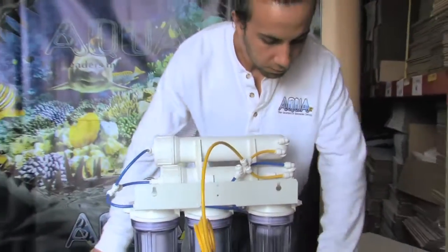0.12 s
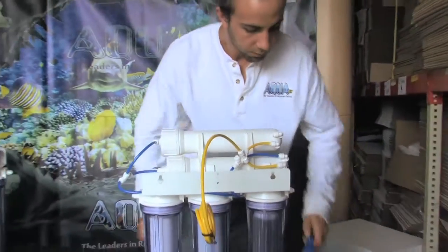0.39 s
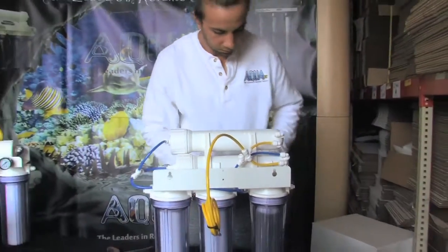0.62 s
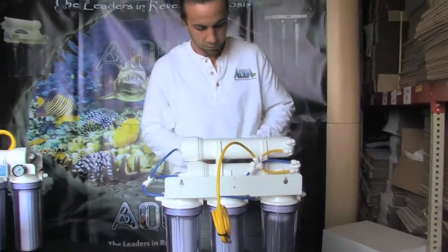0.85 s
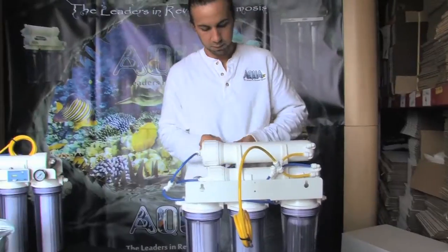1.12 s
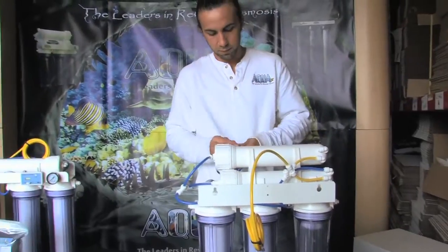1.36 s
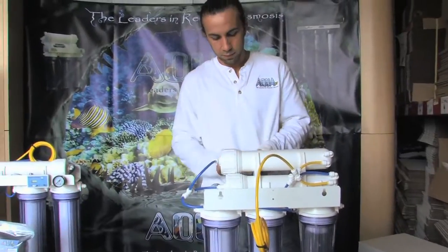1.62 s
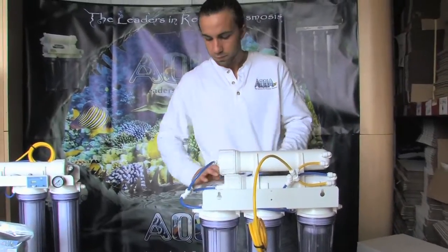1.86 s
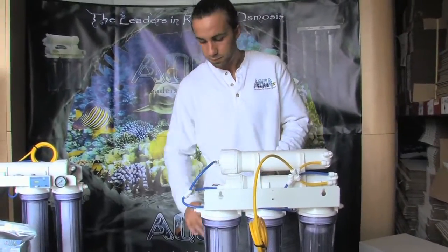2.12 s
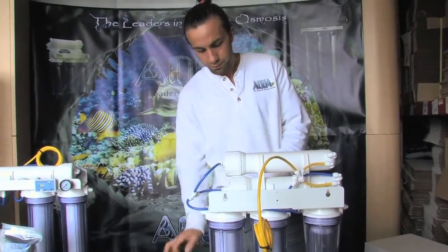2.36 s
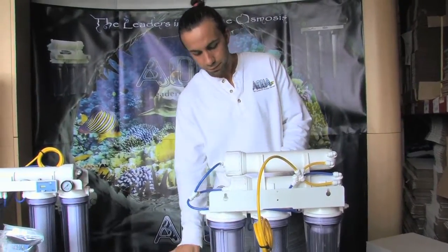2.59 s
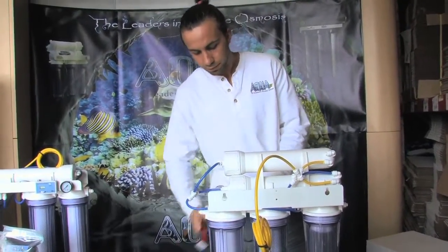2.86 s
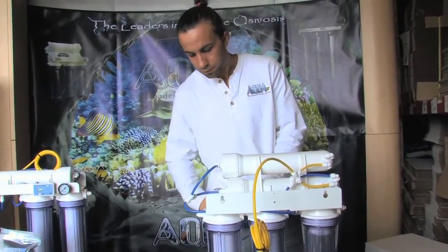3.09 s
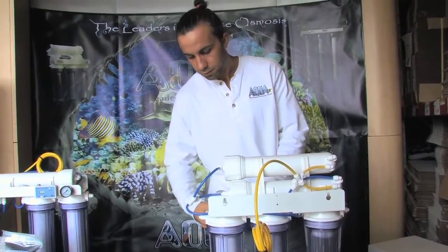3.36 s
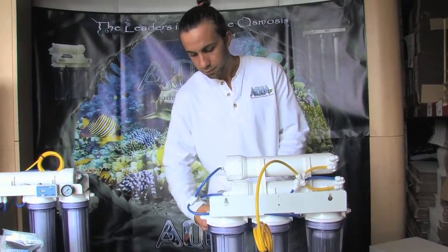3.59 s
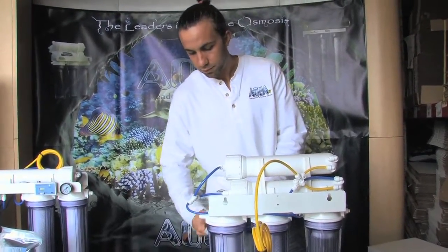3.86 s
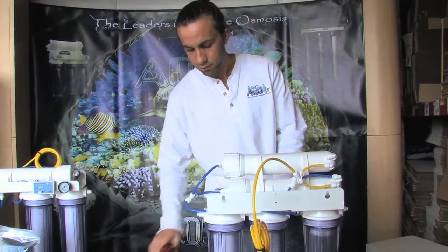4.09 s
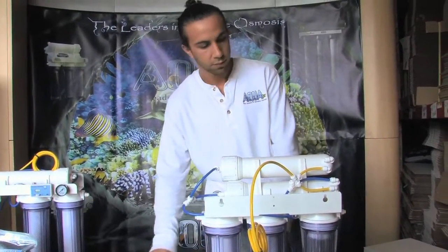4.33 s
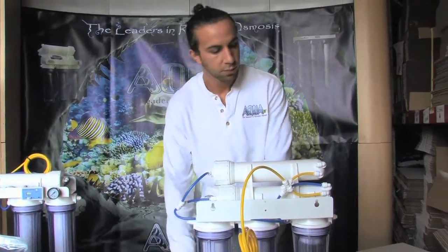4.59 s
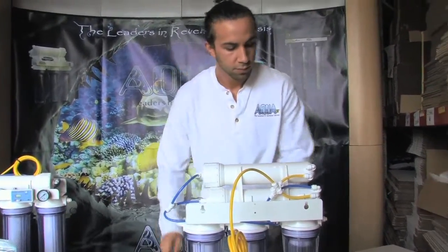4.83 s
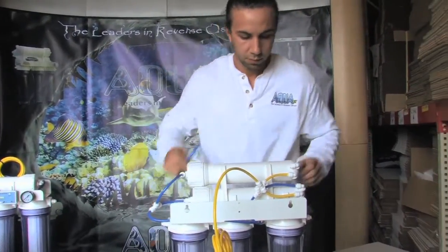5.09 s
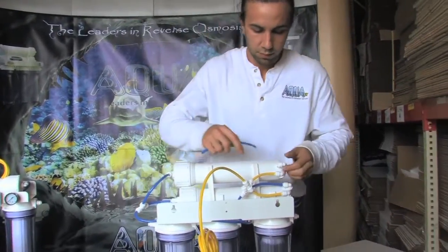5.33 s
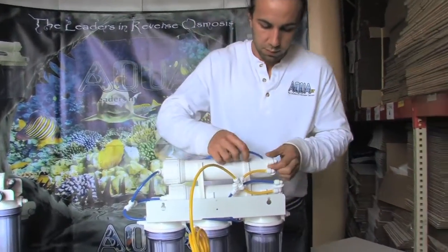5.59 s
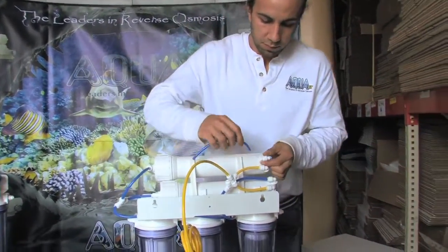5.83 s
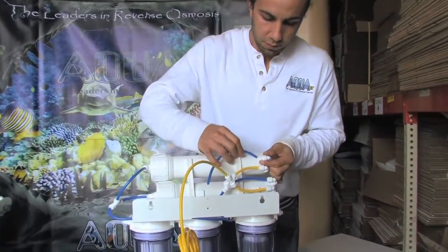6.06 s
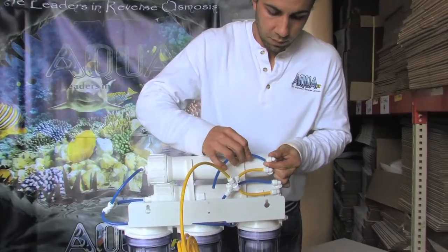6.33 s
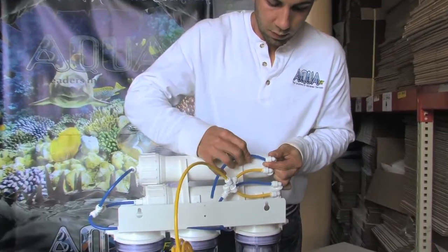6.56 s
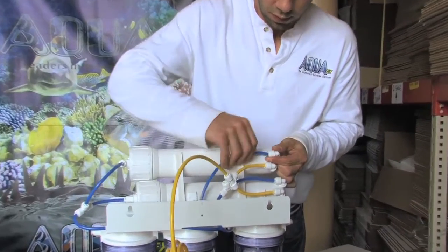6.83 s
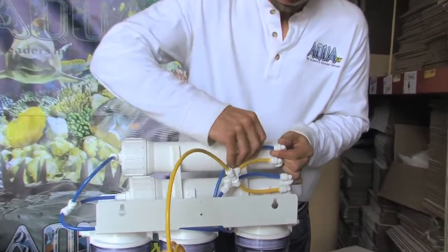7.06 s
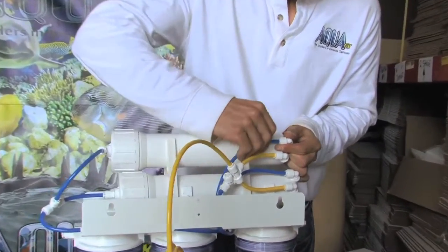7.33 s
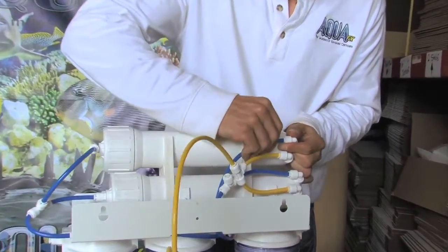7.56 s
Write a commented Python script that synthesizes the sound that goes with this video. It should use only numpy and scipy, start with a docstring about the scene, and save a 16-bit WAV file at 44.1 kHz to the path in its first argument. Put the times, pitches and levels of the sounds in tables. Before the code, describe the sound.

In a quiet storeroom, hands fumble plastic fittings: soft knocks, faint ticks and sleeve rustle, a crisp snap, a loud hollow clatter, then near silence.

```python
"""Plastic push-in fittings and tubing handled on a hollow table top in a quiet storeroom: modal impacts.
Fittings tick and one snaps loudly (damped modes); parts knock and bounce on the top (modes and a dry crack).
Squeaks are gliding tones; sleeves rustle and a finger rubs a tube as swells of shaped noise.
Air noise that slowly swells and sinks, and steady faint microphone hiss, are shaped noise too;
a low sine hum comes and goes, soft thuds are bursts of low noise, and a diffuse room tail follows the hits."""
import sys
import numpy as np
from scipy import signal
from scipy.io import wavfile
from scipy.ndimage import uniform_filter1d, minimum_filter1d

SR = 44100
rng = np.random.default_rng(int(sys.argv[2]) if len(sys.argv) > 2 else 0)


def log_audio(samples):
    """Write samples as a 16-bit WAV file to the path given in sys.argv[1]."""
    # one column per channel
    frames = np.atleast_2d(samples).T
    # limit to full scale, then quantise
    limited = np.clip(frames, -1, 1)
    pcm = np.round(limited * 32767).astype(np.int16)
    wavfile.write(sys.argv[1], SR, pcm)


def attenuation_scalar(level_db):
    """Turn a level in dB into a linear amplitude multiplier (20 dB per decade)."""
    decades = np.asarray(level_db, float) / 20
    return 10 ** decades


N = 338959  # length in samples


def read(points, hz):
    """Spectral interpolation: value of a table on a log-frequency axis."""
    f, value = np.transpose(points)
    return np.interp(np.log(hz + 1), np.log(f + 1), value)


def curve(points):
    """Amplitude envelope: gain of a (t/s, level/dB) curve at every sample."""
    s, db = np.transpose(points)
    return attenuation_scalar(np.interp(np.arange(N) / SR, s, db))


def swells(rows):
    """Addition of incoherent powers: each rises and falls smoothly around its row's middle."""
    t = np.arange(N) / SR
    power = np.zeros(N)
    for middle, length, db in rows:
        phase = np.pi * np.clip((t - middle) / length, -.5, .5)
        power += attenuation_scalar(2 * db) * np.cos(phase) ** 4
    return power


def add(mix, s, sound):
    """Linear superposition: mixes a sound in at time s."""
    part = mix[round(s * SR):][:len(sound)]
    part += sound[:len(part)]


def noise(shape, patchy_db):
    """Gaussian noise by spectral shaping: random short-time spectra with drifting patches, rms 1."""
    a, b, patches = rng.standard_normal((N // 256 + 5, 513, 3)).T
    patches = uniform_filter1d(patches, size=12, axis=0)
    patches = uniform_filter1d(patches, size=12, axis=1)
    shape_db = read(shape, np.fft.rfftfreq(1024, 1 / SR))[:, None]
    spectra = (a + 1j * b) * attenuation_scalar(shape_db + patchy_db * patches / patches.std())
    x = signal.istft(spectra, nperseg=1024, noverlap=768)[1][:N]
    return x / x.std()


def ring(modes, peak_hz, below_db, above_db, damping, minor_db, rise, detune, count):
    """Modal superposition: detuned main modes in a crowd of weaker ones, at chance phases; peak near 1."""
    hz, db, t60 = np.transpose(modes)
    place, phase = rng.random((2, count + len(hz)))
    crowd_place = (np.arange(count) + place[:count]) / count
    crowd = hz[0] * (hz[-1] / hz[0]) ** crowd_place ** .8
    db = np.r_[read(np.c_[hz, db], crowd) + minor_db, db]
    t60 = np.r_[read(np.c_[hz, t60], crowd), t60] / np.clip(damping, .2, 5)
    hz = hz * (1 + detune * (place[count:] - .5))
    # grip and contact pull the nearest mode to the brightest pitch
    hz[abs(np.log(hz / peak_hz)).argmin()] = peak_hz
    hz = np.r_[crowd, hz]
    # levels fall away from the brightest pitch, in dB per octave
    octaves = np.log2(hz / peak_hz)
    db -= np.maximum(-max(below_db, 0) * octaves, max(above_db, 0) * octaves)
    # each mode is a rotating, decaying phasor, computed in blocks of 128 samples
    pole = (2j * np.pi * hz - np.log(1000) / t60) / SR
    blocks, within = np.arange(0, t60.max() * SR, 128), np.arange(128)
    starts = attenuation_scalar(db) * np.exp(2j * np.pi * phase + blocks[:, None] * pole)  # state at each block start
    sound = (starts @ np.exp(pole[:, None] * within)).imag.ravel()
    t = np.arange(len(sound)) / SR
    sound *= (1 - np.exp(-t / rise)) ** 2
    return sound / np.sqrt(4 * uniform_filter1d(sound ** 2, size=220).max())


def hiss():
    """Electronic noise: the microphone's stationary random signal lies mostly in the treble."""
    # hiss spectrum: f/Hz, relative level/dB per Hz
    hiss_shape = [(1000, -20), (3000, -1), (9200, -1), (9900, 2), (10600, -2), (13000, -1), (16000, -2)]
    return attenuation_scalar(-77.5) * noise(hiss_shape, patchy_db=0.1)


def air():
    """Broadband random noise: the room's air noise, mostly low, slowly swells and sinks."""
    # air spectrum: f/Hz, relative level/dB per Hz
    air_shape = [(20, -53.5), (45, -15), (75, -1), (124, 3), (180, -4), (300, -4), (420, -6), (950, -4.5),
                 (1500, -9.5), (2000, -13.5), (2550, -17.5), (3100, -25), (4200, -31), (9000, -34.5),
                 (16000, -45)]
    # air noise, swelling in the middle: t/s, level/dB
    air_level = [(0, -51.5), (.5, -59), (1.45, -57), (2, -59.5), (2.6, -57.5), (3.2, -60), (3.6, -57.5),
                 (3.75, -54), (4, -57.5), (4.3, -49.5), (5.1, -48.5), (5.6, -53.5), (5.75, -58.5),
                 (7.1, -58), (7.4, -55.5), (7.69, -61)]
    return curve(air_level) * noise(air_shape, patchy_db=.6)


def hum():
    """Amplitude modulation: a low sine of fixed frequency fades in and out."""
    # hum swells: middle t/s, length t/s, level/dB
    hum_rows = [(4.95, 0.84, -51), (5.45, .2, -61), (6.75, 0.45, -57.5), (7.05, 0.3, -62),
                (7.26, 0.42, -52), (7.55, .5, -56), (7.7, 0.083, -48)]
    hum_hz = 127
    return np.sqrt(2 * swells(hum_rows)) * np.sin(2 * np.pi * hum_hz * np.arange(N) / SR)


def thuds():
    """Low-frequency transients: soft pushes through floor and table swell quickly and die as rumble."""
    # soft pushes: t/s, level/dB, length t/s (the swell peaks after a third of it)
    pushes = [(0.134, -46, 0.21), (.3, -49.5, 0.033), (1.814, -57.5, 0.048), (2.685, -49.5, 0.085),
              (3.771, -49, 0.037), (4.328, -46.5, 0.23), (4.46, -36, 0.13), (4.685, -59, 0.11),
              (5.497, -59.5, 0.17), (6.22, -57, 0.12), (6.629, -59, 0.059)]
    # rumble spectrum: f/Hz, relative level/dB per Hz
    rumble_shape = [(25, -30.5), (50, -6), (75, -1), (110, -2.5), (160, -12), (300, -51), (16000, -120)]
    swell, t = np.zeros(N), np.arange(SR // 2) / SR
    for s, db, length in pushes:
        u = 3 * t / length
        add(swell, s, attenuation_scalar(db) * u * np.exp(1 - u))
    return swell * noise(rumble_shape, patchy_db=-0.5)


def rustle():
    """Friction noise: strokes of the sleeves swell as broadband noise over a faint rest level."""
    # sleeve strokes: middle t/s, length t/s, level/dB
    strokes = [(.05, .5, -76), (.35, .26, -60), (1.07, .12, -67), (1.5, .8, -72), (2.68, .25, -66),
               (2.885, .05, -62), (3.68, .45, -69), (4.5, .9, -63.5), (5, .5, -64), (5.25, .9, -66),
               (5.61, .08, -79)]
    # cloth spectrum: f/Hz, relative level/dB per Hz
    cloth_shape = [(1000, -38), (2000, -5), (3500, -7.5), (6000, -11.5), (9000, -14), (12000, -15),
                   (16000, -21)]
    rest_db = -76.5
    power = attenuation_scalar(2 * rest_db) + swells(strokes)
    return np.sqrt(power) * noise(cloth_shape, patchy_db=2)


def tube_rubs():
    """Narrow-band friction noise: a finger rubs a tube."""
    # rubs: middle t/s, length t/s, level/dB
    rubs = [(1.15, 0.37, -72), (1.42, .35, -66.5)]
    # rubbed tube spectrum: f/Hz, relative level/dB per Hz
    rub_shape = [(1500, -42), (2200, 1), (2400, 2), (2650, -10), (3600, -40)]
    return np.sqrt(swells(rubs)) * noise(rub_shape, patchy_db=2)


def squeaks():
    """Stick-slip oscillation: fast slips of plastic on plastic give a short, wavering, gliding tone."""
    # squeaks: t/s, level/dB, starting f/Hz before waver, glide as a frequency factor, length t/s
    slides = [(0.135, -57, 3050, .99, 0.055), (1.274, -58, 5200, 0.82, 0.017),
              (1.303, -61, 5100, .96, .014), (1.318, -68, 6800, 0.81, .014),
              (1.446, -55, 3330, 1.03, 0.011), (1.69, -70, 12200, .94, .02),
              (7.332, -48.5, 2500, 1.43, 0.013), (7.642, -57, 1700, 1.01, 0.011),
              (7.654, -49.5, 1590, 1.02, 0.0087)]
    out = np.zeros(N)
    for s, db, hz, glide, length in slides:
        u = np.linspace(0, 1, round(length * SR))
        waver = 1 + .15 * uniform_filter1d(rng.standard_normal(4000), size=60)[:len(u)]
        cycles = np.cumsum(hz * glide ** u * waver) / SR
        add(out, s, attenuation_scalar(db) * np.sin(np.pi * u) * np.sin(2 * np.pi * cycles))
    return out


def knocks():
    """Impact excitation: blows ring the top where the contact favours it, with a dry crack at the start."""
    # blows: t/s, level/dB, crack level/dB relative to the blow, brightest f/Hz, fall away from it/dB per octave
    blows = [(0.107, -35, -31.5, 900, 2), (0.144, -20, -28, 655, 6), (0.158, -25.5, -25, 604, 2),
             (0.187, -25.5, -34, 1265, 22), (0.193, -28, -34, 1150, 6), (0.205, -28, -33, 400, 4),
             (.220, -27.5, -36, 830, 11), (0.239, -26.5, -25, 790, 6), (0.28, -42, -23, 164.4, 15),
             (2.567, -33.5, -29, 510, 12), (2.589, -41, -18, 200.6, 11), (2.683, -42, -36, 1020, 8),
             (2.689, -39, -37, 1100, 11), (2.696, -28.5, -34, 666, 9), (2.714, -36, -29, 304, 10),
             (3.876, -19.5, -1, 900, 7), (3.894, -16.5, -7, 900, 7), (3.907, -19.5, -37, 840, 26),
             (3.924, -23, -34, 1000, 6), (4.049, -34, -15, 886, 2), (4.077, -27, -13, 1076, 5),
             (4.3292, -27, -31.5, 1200, 7), (4.331, -0.5, -27, 750, 3.5), (4.341, -14, -6.5, 290, 3.5),
             (4.370, -5, -9, 1500, 6.5), (4.373, -0.5, -17, 566, 6), (4.379, -4, -13.5, 720, 8.5),
             (4.384, -24, -16, 747, 14.5), (4.397, -18, -28, 500, 1.5), (4.459, -12, -40, 670, 6),
             (4.467, -16, -40, 720, 8), (4.481, -17.5, -33, 1080, 7), (4.485, -9.5, -35, 555, 6),
             (4.504, -17, -32, 282, 11), (4.542, -17.5, -14.5, 839, 2), (4.56, -18.5, -19, 627, 6),
             (4.576, -16.5, -33, 400, 16), (4.605, -19.5, -16, 344.7, 5), (4.626, -32, -10, 334, 4.5),
             (4.707, -6.5, -15, 616, 3), (4.718, -9.5, -29.5, 670, 4), (4.726, -10.5, -16, 592, 3.5),
             (4.79, -24, -15.5, 670, 4), (4.802, -24, -30, 790, 1), (5.6, -40.5, -16, 1386, 18),
             (7.292, -45.5, -19.5, 900, -1), (7.609, -44.5, -23, 735, 8)]
    # table top modes: f/Hz, relative level/dB, t60/s before damping
    top_modes = [(150.8, -5.5, 0.18), (168, -7, 0.36), (239, -23, 0.085), (290, -5.5, 0.11),
                 (402, -18.5, 0.23), (424, -8.5, 0.078), (496, 0.5, 0.023), (582, -3, 0.084),
                 (690, -14, 0.053), (735, -2.5, 0.07), (790, -5.5, 0.12), (900, 0, 0.04), (1000, -5, 0.073),
                 (1220, -9.5, .08), (1396, -7.5, 0.078), (1500, -11.5, 0.092), (1806, 1.5, 0.017),
                 (1960, -12.5, 0.039), (2097, -12, 0.057), (2180, -7.5, 0.04), (2488, -5, 0.048),
                 (2730, -10.5, 0.054), (3004, -17, 0.14), (3450, -33, 0.059), (3800, -13, 0.043),
                 (4325, -31.5, .04), (5100, -41, .04)]
    full_damping, damping_db_per_db = 1.59, 0.1053  # full_damping holds for a 0 dB blow
    soft_fall_db_per_db = 0.07  # dB per octave for each dB of crack level

    t = np.arange(900) / SR
    band = signal.butter(1, [2300, 4210], "band", fs=SR, output="sos")
    treble_cut = signal.butter(2, 6000, fs=SR, output="sos")
    cracks = signal.sosfilt(np.r_[band, treble_cut], rng.standard_normal((len(blows), len(t))))
    cracks *= attenuation_scalar(-60 * t / 0.024) * (1 - np.exp(-t / 0.00034))

    out = np.zeros(N)
    for (s, db, crack_db, hz, fall_db), crack in zip(blows, cracks):
        # harder blows leave the part pressed on the top and die sooner
        damping = full_damping * attenuation_scalar(damping_db_per_db * db)
        # the weaker the crack, the softer the contact and the duller the blow
        above_db = fall_db - soft_fall_db_per_db * crack_db
        blow = ring(top_modes, hz, fall_db, above_db, damping,
                    minor_db=-4.0, rise=0.00042, detune=0.03, count=60)
        add(out, s, attenuation_scalar(db) * blow)
        crack_peak = np.sqrt(4 * uniform_filter1d(crack ** 2, size=100).max())
        add(out, s, attenuation_scalar(db + crack_db) * crack / crack_peak)
    return out


def ticks():
    """Modal response to impact: small hard contacts ring the fitting near the brightest pitch."""
    # contacts: t/s, level/dB, brightest f/Hz, fall above it/dB per octave
    contacts = [(0.143, -42, 2900, 4), (0.1606, -42, 2300, 1), (0.1687, -44, 2300, 3),
                (0.1774, -48, 2300, 4), (0.2203, -43, 2300, 4), (0.2486, -46, 7200, 5),
                (0.256, -38.5, 4200, 1), (0.9948, -43, 3900, 6), (1.0014, -37.5, 4300, 9),
                (1.075, -50, 3800, 14), (1.4506, -49.5, 3430, 3), (1.5704, -60, 2920, 6),
                (1.5803, -38.5, 4320, 8), (1.5893, -42, 3590, 3), (1.754, -56, 4550, 3.5),
                (1.7793, -42.5, 3320, 0), (1.7928, -33, 3410, 20), (1.8113, -44, 3170, 5),
                (1.8372, -50, 2860, 15), (1.8956, -52, 3140, 8.9), (2.6364, -51, 3230, 10),
                (2.711, -49.5, 2700, 12), (2.8936, -48.5, 3820, 9), (2.984, -56, 2740, 7),
                (3.035, -52.5, 6440, 2), (3.1524, -46, 4150, 15), (3.2174, -44, 4750, 14),
                (3.3144, -62, 4200, 14), (3.466, -51.5, 2680, 9.9), (3.5402, -47, 3300, 10),
                (4.167, -53, 7450, -1), (4.3321, -20.5, 7650, 3.5), (4.339, -25, 6850, 4),
                (4.356, -33, 7200, 3), (4.3705, -23, 5200, 1.5), (4.3765, -24, 8000, 1.5),
                (4.3824, -19, 7370, 8), (4.3905, -30, 9000, 3), (4.4, -33, 7500, 4),
                (4.5456, -22.5, 2830, -0.3), (4.5525, -27.5, 2860, 4.5), (4.584, -31.5, 2750, 5),
                (4.6076, -42, 2580, 0), (4.7078, -22, 9900, 7.5), (4.714, -25.5, 8800, -1),
                (4.7324, -33, 7200, 11), (4.7257, -20.5, 2860, 16), (4.7415, -29, 9600, 9),
                (5.5739, -30, 7020, 1.5), (6.4368, -50, 7340, 6), (6.4606, -45.5, 6960, 4),
                (7.156, -49, 2580, 4), (7.1893, -32, 4250, 2), (7.1888, -32.5, 11850, 3),
                (7.3115, -56, 3070, -5), (7.3337, -44, 2860, 5)]
    # fitting modes: f/Hz, relative level/dB, t60/s before damping
    fitting_modes = [(1000, 2.5, 0.017), (1800, 5, 0.011), (2320, -0.5, 0.015), (3170, 6.5, 0.0076),
                     (4216, 3, 0.0084), (5400, -3, 0.0056), (6510, 9, 0.0047), (8290, 9.5, 0.0031),
                     (10020, -0.5, 0.0082), (11310, 0, 0.0079), (14000, -8, .007), (15680, -9, 0.0064)]
    out = np.zeros(N)
    for s, db, hz, above_db in contacts:
        below_db = 1 + 1.4 * above_db  # a tick that is narrow above its pitch is narrow below it too
        tick = ring(fitting_modes, hz, below_db, above_db, damping=0.72,
                    minor_db=-3.5, rise=0.00054, detune=0.068, count=60)
        add(out, s, attenuation_scalar(db) * tick)
    return out


def snap():
    """Repeated impulsive excitation: a few slips within milliseconds each ring the collar anew."""
    # slips: t/s, level/dB
    slips = [(3.781, -31), (3.7834, -14.5), (3.7842, -3.5), (3.7858, -12.5)]
    # snapping collar modes: f/Hz, relative level/dB, t60/s before damping
    collar_modes = [(178.4, -13.5, 0.0098), (500, -8, 0.0059), (950, -22, 0.0088), (1290, -8.5, 0.034),
                    (1740, -3, 0.034), (2250, -5.5, 0.029), (2700, -6, 0.017), (3140, -3.5, 0.028),
                    (3537, -7.5, .02), (4350, -2, .017), (5175, -5, 0.03), (5960, -2, 0.013),
                    (6650, -3, .015), (8100, -6, .013), (9650, -6, .015), (10940, -12, 0.015),
                    (12800, -15, .012), (15170, -29.5, .011)]
    out = np.zeros(N)
    for s, db in slips:
        slip = ring(collar_modes, 1712, 0, 0, damping=0.96,
                    minor_db=-11, rise=0.00034, detune=0.0067, count=200)
        add(out, s, attenuation_scalar(db) * slip)
    return out


def room(x):
    """Diffuse field: each band's energy arrives a little late, dies at its own speed, has chance phases."""
    # reverberation time: f/Hz, t60/s
    room_t60 = [(150, .25), (400, 0.14), (1000, .18), (2800, 0.19), (7000, 0.25), (14000, 0.3)]
    hz, t, z = signal.stft(x, SR, nperseg=256, noverlap=192)
    power = uniform_filter1d(abs(z) ** 2, size=3, axis=0)
    keep = attenuation_scalar(-120 * t[1] / read(room_t60, hz))  # share of the energy left after one frame
    power = np.array([signal.lfilter([1 - k], [1, -k], p) for k, p in zip(keep, power)])
    a, b = rng.standard_normal((len(t), len(hz), 2)).T
    tail_spectra = np.sqrt(abs(power)) * (a + 1j * b)
    tail = signal.istft(tail_spectra, SR, nperseg=256, noverlap=192)[1]
    return np.r_[np.zeros(300), tail][:N]  # delay in samples


def scene():
    """Superposition of direct and diffuse fields: hits with their room sound over the other layers."""
    low, high, loud = knocks(), ticks() + squeaks(), snap()
    wet = room(attenuation_scalar(-5.5) * low + attenuation_scalar(-12.5) * high + attenuation_scalar(-11.5) * loud)
    friction = rustle() + tube_rubs()
    background = air() + hiss() + hum() + thuds()
    return (low + high + loud + wet + friction + background)[None]


def low_pass(x):
    """Removes everything above the highest recorded frequency."""
    return signal.sosfilt(signal.butter(12, 16460, fs=SR, output="sos"), x)


def record(dry):
    """Band limiting and gain control: deep bass and top edge are lost, a fast limiter holds the peaks."""
    bass_cut = signal.sosfilt(signal.butter(3, 42, "high", fs=SR, output="sos"), dry)
    headroom = np.minimum(1, .85 / (abs(bass_cut) + 1e-9))
    headroom = minimum_filter1d(headroom, size=180)
    gain = uniform_filter1d(uniform_filter1d(headroom, size=90), size=90)
    limited = bass_cut * gain
    edge = signal.firwin(255, 15900, window=("kaiser", 8), fs=SR)
    finished = signal.oaconvolve(limited, edge[None], "same")
    return low_pass(finished)


dry = scene()
out = record(dry)
log_audio(out)
```